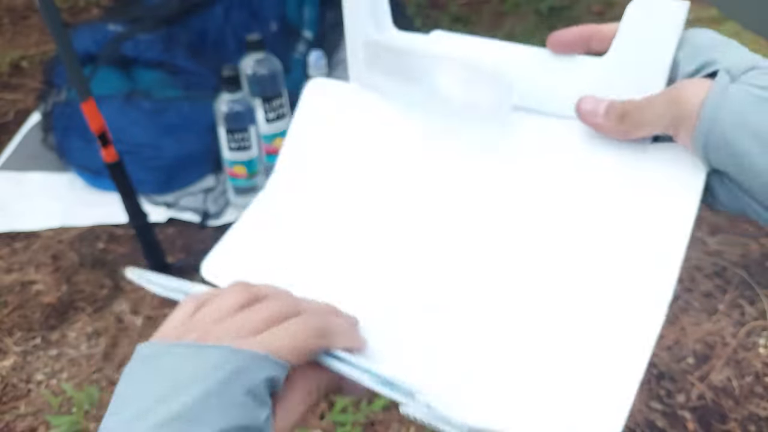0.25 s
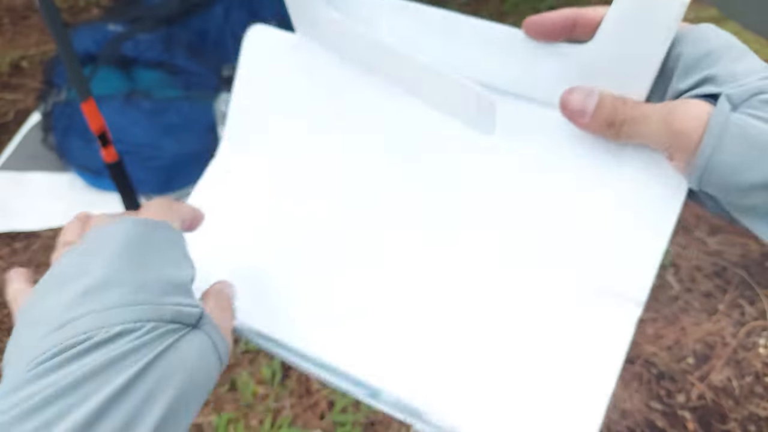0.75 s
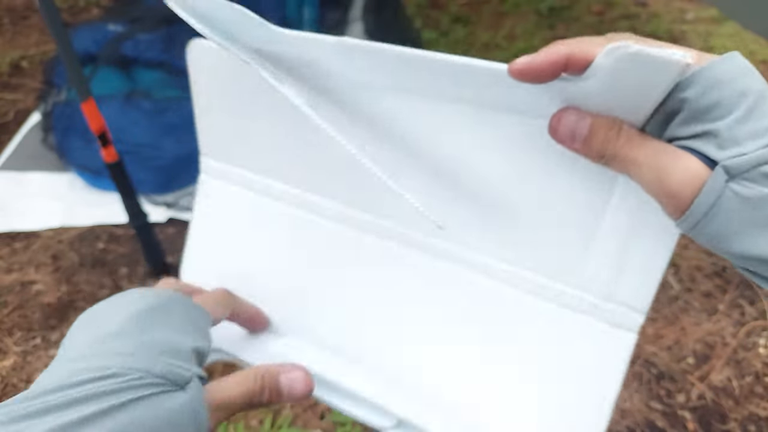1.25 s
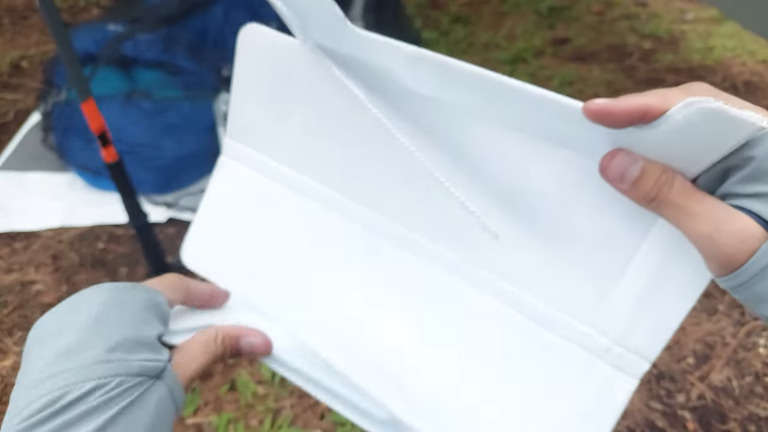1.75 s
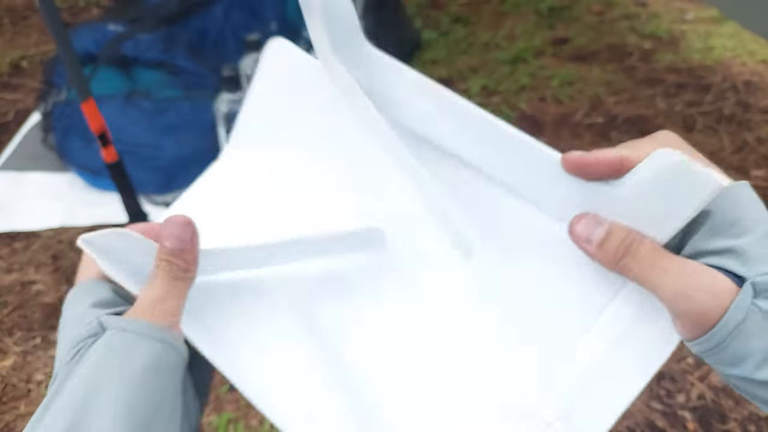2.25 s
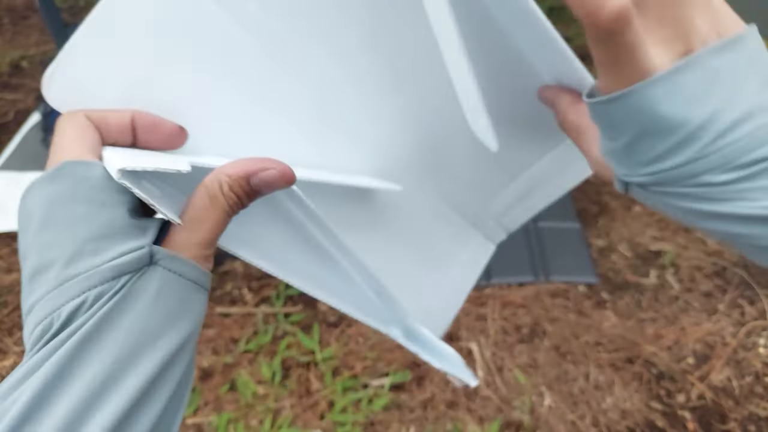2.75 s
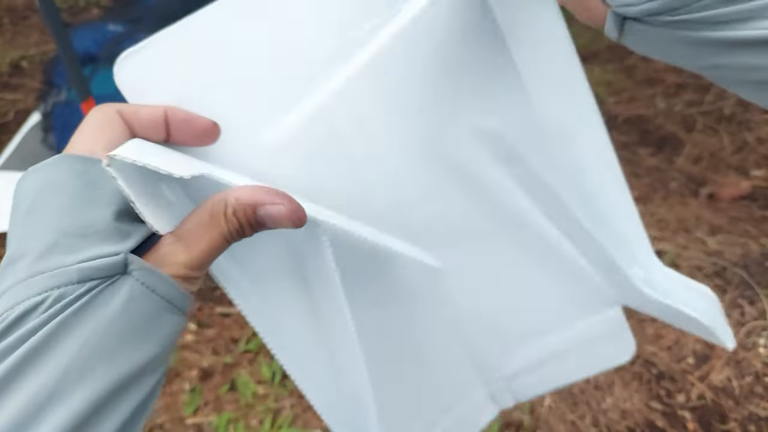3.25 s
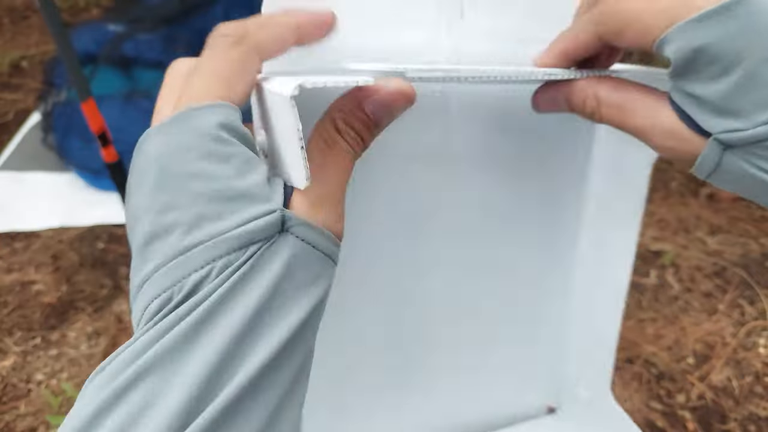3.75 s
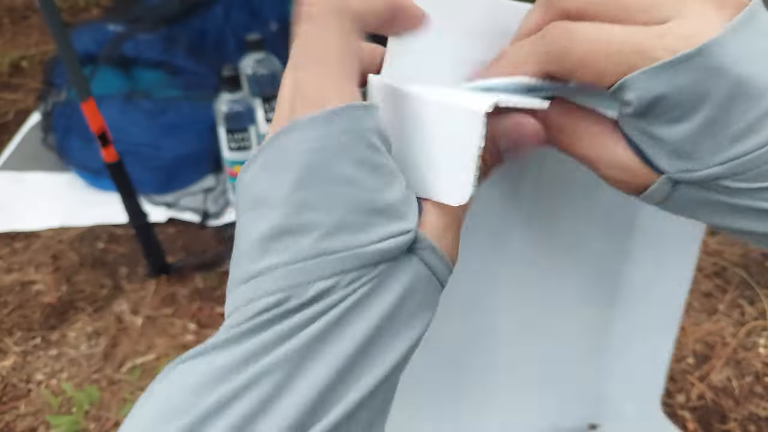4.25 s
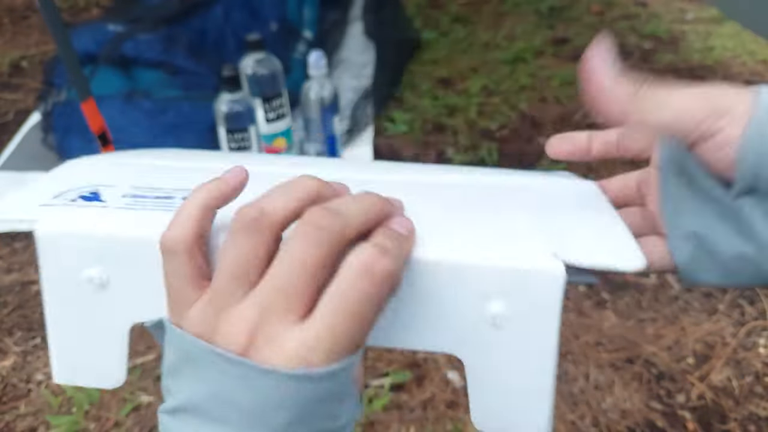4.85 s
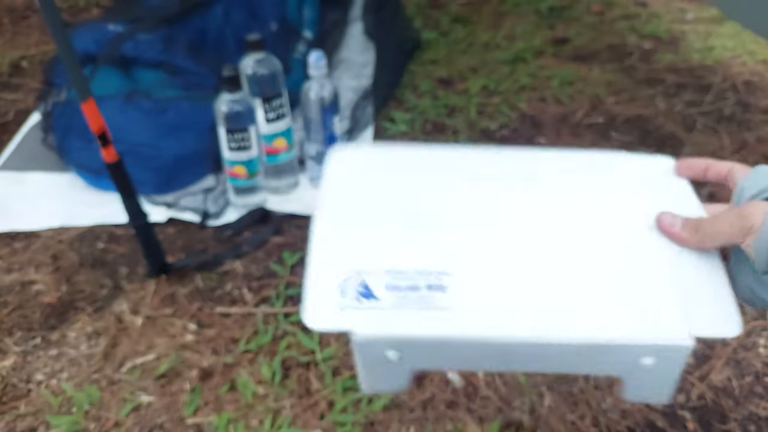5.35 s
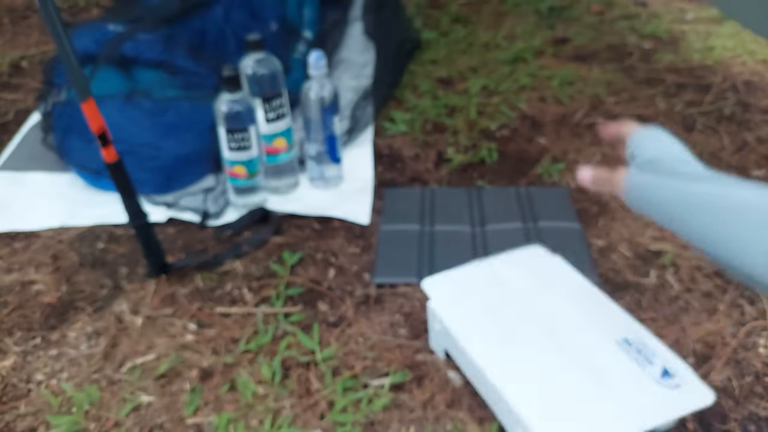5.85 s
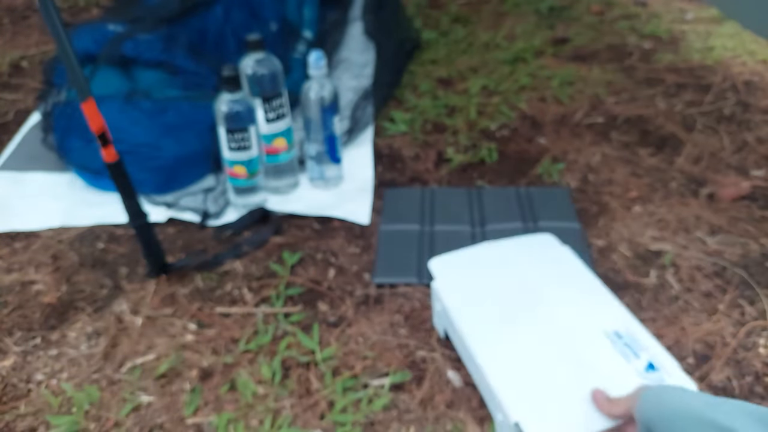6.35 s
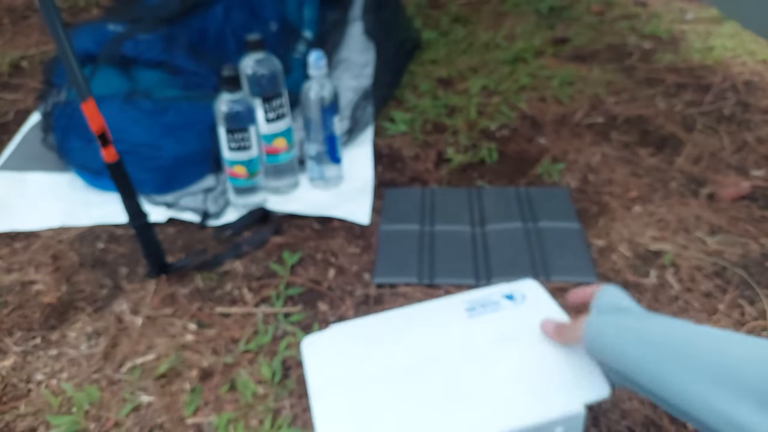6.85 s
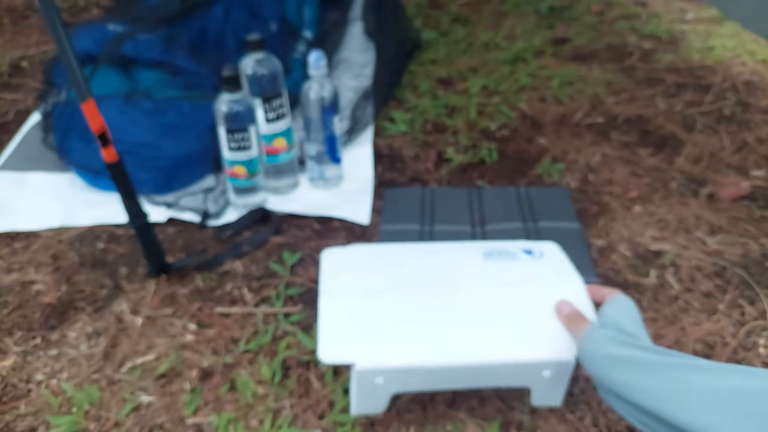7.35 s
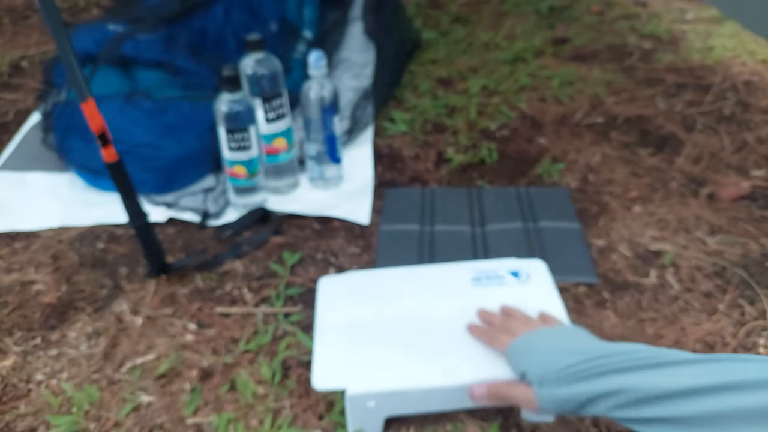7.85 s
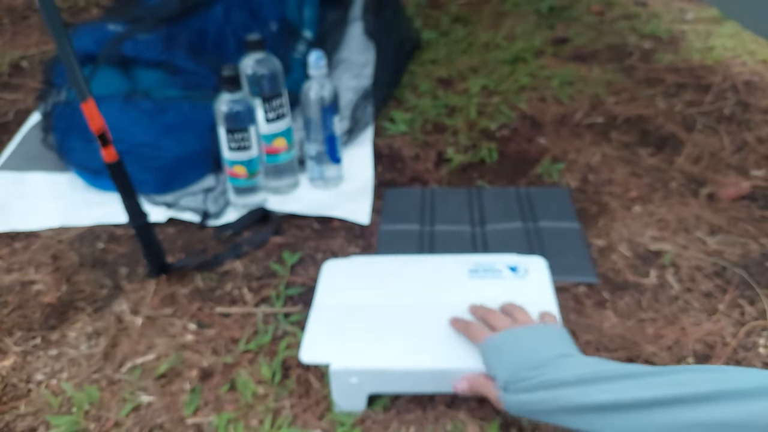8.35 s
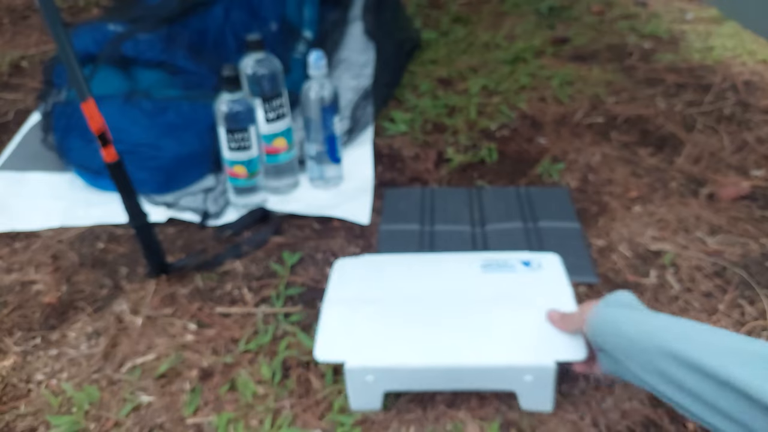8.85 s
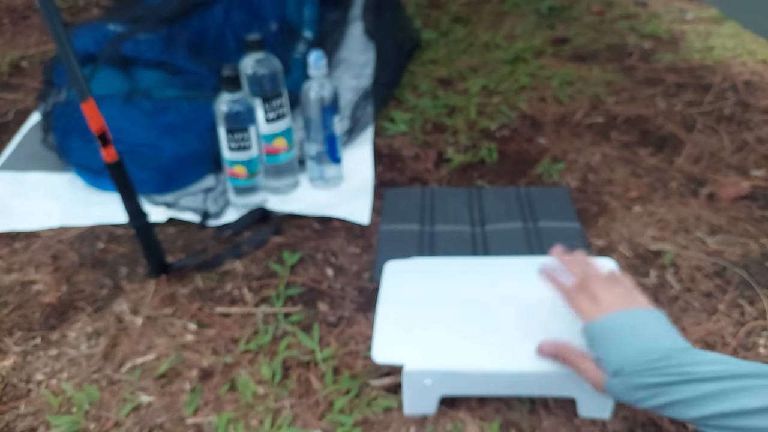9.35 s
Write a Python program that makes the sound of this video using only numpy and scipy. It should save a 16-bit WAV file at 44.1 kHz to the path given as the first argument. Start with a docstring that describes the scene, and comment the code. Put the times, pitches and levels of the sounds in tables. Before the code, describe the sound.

Dry, close outdoor sound on forest litter. From 0 to 1.9 s, hands handle a light fluted plastic sheet: faint ticks, small clicks around 1.1 s, skin rubs and sleeve swishes. At 1.95-2.4 s comes a lively cluster of hollow flap pops, loudest at 1.95 and 2.25, with a short crease creak and gritty scrapes. Sparse clicks and rustles follow; around 4.0-4.4 s low air puffs buffet the microphone among more clicks. A scrape at 5.15, then the legs land in a quick hollow knock at 6.0. A duller click at 7.0 and small shuffles precede two firm, boxy snaps at 8.0 and 9.5 s. Throughout, a high pulsing cicada buzz: one slows and ends near 3.5 s, another starts about 3.7, strongest mid-call, and fades by 9.7. Distant chorus hiss, soft rumble and a faint low hum, slightly stronger from 4.3 to 6.3, lie beneath.

```python
"""Forest litter: a small table of fluted plastic sheet is folded into shape by hand near the microphone and set down.
Clicks, knocks and creaks ring damped modes of flap, sheet, panel and top; the top snaps twice under a pressing palm.
Hands, sleeves and scrapes are coloured trains of tiny slips; gusts are low noise that buffets the microphone.
Two cicadas throb in turn as pulsed, pumped noise before a far chorus, over a low rumble and a faint hum."""
import sys
import numpy as np
from scipy import signal
from scipy.fft import rfft, irfft, next_fast_len
from scipy.io import wavfile
from scipy.ndimage import uniform_filter1d

SR = 44100
rng = np.random.default_rng(int(sys.argv[2]) if len(sys.argv) > 2 else 0)


def pcm_store(signal):
    """Save signal as 16-bit PCM."""
    levels = np.round(np.clip(np.atleast_2d(signal), -1, 1) * 32767)
    wavfile.write(sys.argv[1], SR, levels.astype(np.int16).T)


N = 423801

# Levels are set before the high-passes; gesture lengths run between half-gain points.
# flap and finger clicks: start_s, flap_peak_db, nominal_pitch_hz, sheet_re_flap_db, crack_re_flap_db
FLAP_CLICKS = [(0.068, -30.5, 400, 0, -5.5), (0.222, -38, 320, -3, 4.5), (0.716, -38.5, 357, 6, -2.5),
               (1.023, -39.5, 353, -3.5, -10), (1.053, -37.5, 397, -11, -5), (1.119, -34, 350, -9, 0.5),
               (1.136, -42, 350, -5, -8), (1.167, -32.5, 313, 10.5, -2), (1.43, -47, 250, 7.5, -13),
               (1.947, -20, 326, -9.5, -17.5), (1.982, -25, 262, -3.5, -13.5), (2.036, -30, 333, -22, -2.5),
               (2.073, -38.5, 202, -2, 3), (2.106, -29.5, 326, -9, -26), (2.176, -32.5, 215, -13, -10),
               (2.250, -16.5, 400, -11, -32), (2.299, -35, 350, -6, -24), (2.342, -34.5, 308, -9, -17),
               (2.370, -40, 336, -8, 3.5), (2.382, -38, 334, -3, -4), (2.415, -33.5, 343, -12, -13),
               (2.539, -32.5, 337, 2, -9), (2.682, -33, 224, 0, -14.5), (3.114, -37, 320, -8, -9.5),
               (3.783, -40, 205, -9, -1), (3.987, -26, 236, -7.5, -16), (4.144, -32.5, 290, -7.5, -20),
               (4.207, -38.5, 235, -6, -2), (4.325, -29.5, 221, -32, -10), (4.366, -40.5, 202, -25, 6.5),
               (4.413, -31.5, 577, 2, -11), (4.612, -38, 280, -1, -19), (4.656, -38, 237, -7, -9),
               (4.784, -34, 204, -14, -28), (5.911, -33.5, 364, -4, -5), (5.954, -35, 530, -10, -13.5),
               (6.111, -29.5, 308, -19, -31.5), (6.98, -23, 230, -14.5, -28), (7.155, -40, 554, -1.5, -12),
               (7.609, -31.5, 297, 0.5, -14), (8.343, -43, 356, -2.5, -18)]
# blows of landing and snap-through: start_s, body_peak_db, pitch_ratio, tilt_db_per_octave, sheet_peak_db, crack_peak_db
TABLE_BLOWS = [(5.979, -28, 1.67, -1, -23.5, -42), (5.986, -26, 1.1, 7, -37, -26.5),
               (5.989, -19, 1.08, -10, -29.5, -50), (7.979, -26.5, 0.97, -8, -38.5, -40),
               (7.9847, -19.5, 1.05, 20, -17, -22.5), (7.9924, -13.5, 1.02, 11, -18, -22.5),
               (7.998, -18, 1.01, 3, -40, -59), (9.5232, -21.5, 1.03, -7, -39, -29.5),
               (9.531, -12, 1.03, -1.5, -17.5, -23), (9.5369, -17, 1.13, 2, -17.5, -38),
               (9.566, -44, 1.2, 4, -46, -57)]
# bending modes of the standing table, before ratio and tilt: nominal_hz, level_db, t60_s
TABLE_MODES = [(198, -31, 0.048), (239.6, -3.5, 0.049), (343, 2.5, 0.044), (584, -6.5, 0.056),
               (664, 5, 0.022)]
# higher modes of the plastic sheet, before ratio: nominal_hz, level_db, t60_s
PLASTIC_MODES = [(967, -9, 0.017), (1104, 3.5, 0.0078), (1274, 6, 0.011), (1470, -1.5, 0.0097),
                 (1860, 3.5, 0.0097), (2040, -7.5, 0.009), (2150, -34.5, 0.044), (2586, -2.5, 0.013),
                 (3310, -6.5, 0.011), (3840, -9, 0.026)]
# modes of the creaking side panel: freq_hz, level_db, t60_s
PANEL_MODES = [(317, -9, 0.037), (368, -0.5, 0.074), (411, 3, 0.11)]
# spectrum of a cracking crease: freq_hz, level_db
CRACK_SPECTRUM = [(500, -3), (1500, -8.5), (4000, -1), (5300, -6), (7300, -3.5), (8800, -14.5),
                  (11500, -0.5), (15500, -4)]
# spectrum of skin on ribbed sheet: freq_hz, level_db
RUB_SPECTRUM = [(200, 20), (380, 18.5), (650, 14.5), (900, -2), (1500, 6), (2300, -16.5), (3500, 1.5),
                (7000, -28)]
# spectrum of a sleeve: freq_hz, level_db
SWISH_SPECTRUM = [(1000, 8.5), (2500, 3.5), (4500, 4.5), (6000, -4), (7400, 4), (8800, -9), (11000, 1),
                  (13000, 2.5), (15500, -3)]
# spectrum of air buffeting the microphone: freq_hz, level_db
GUST_SPECTRUM = [(25, -6), (50, -6), (85, -1), (150, -7.5), (260, -13.5), (380, -24.5), (480, -30),
                 (800, -47)]
# spectrum of the outdoor rumble: freq_hz, level_db
RUMBLE_SPECTRUM = [(15, -61), (25, -31), (70, 1), (162, -4), (247, -5), (283, -5.5), (406, -17.5),
                   (573, -24), (707, -25.5), (1330, -40.5), (1490, -34.5), (2400, -36), (3120, -64.5),
                   (5280, -120)]
# body resonances of the first near cicada: freq_hz, level_db
FIRST_BODY = [(2800, -43), (3400, -32), (3750, -3.5), (3970, 4.5), (4150, -3), (4450, -11.5), (6000, -40),
              (7300, -10.5), (8700, -59), (11200, -15), (12500, -39), (13800, -14), (14700, -1.5),
              (15700, -26.5)]
# body resonances of the second near cicada: freq_hz, level_db
SECOND_BODY = [(2800, -46), (3400, -33), (3800, -1), (4040, 1.5), (4200, -6.5), (4450, -18.5),
               (5800, -37.5), (7350, -14), (8600, -38.5), (10300, -18.5), (11300, -7.5), (12100, -31),
               (14600, -22.5), (15700, -24)]
# spectrum of the far cicadas: freq_hz, level_db
CHORUS_SPECTRUM = [(2400, -26), (3300, -6), (3850, -1), (4450, -15), (5900, -30.5), (7300, -12),
                   (8700, -33.5), (10200, -21), (11150, -10.5), (12100, -21.5), (14600, -21.5),
                   (15700, -29)]
# sheet, sleeves and ground scraping (window lasts 1.5 lengths): middle_s, nominal_length_s, level_db, centre_hz
SCRAPE_RUNS = [(0.194, 0.059, -59, 1460), (0.196, 0.067, -57, 13100), (0.681, 0.044, -54.5, 1840),
               (1.088, 0.11, -57.5, 1880), (1.488, .07, -58.5, 1560), (1.749, 0.041, -53.5, 1560),
               (1.895, 0.037, -54.5, 1460), (2.032, .04, -51.5, 1620), (2.173, 0.064, -54.5, 1710),
               (2.228, 0.031, -44.5, 1550), (2.382, 0.03, -47, 1530), (2.463, 0.08, -54.5, 13200),
               (2.683, 0.023, -48, 1450), (2.838, 0.063, -57, 550), (2.916, 0.033, -60, 1320),
               (3.3, .048, -56.5, 13600), (3.338, 0.043, -54, 1400), (3.34, 0.047, -58, 630),
               (3.721, 0.05, -51, 616), (3.725, 0.08, -57.5, 1550), (3.754, 0.069, -61.5, 13100),
               (4.308, 0.05, -53.5, 1190), (4.417, 0.013, -40.5, 2380), (4.453, 0.059, -57, 2180),
               (4.508, 0.041, -54.5, 1290), (4.944, 0.1, -60, 13900), (5.156, 0.058, -44, 1450),
               (5.57, 0.44, -68.5, 2470), (6.47, 0.06, -56.5, 564), (6.488, 0.12, -67, 1790),
               (7.011, 0.063, -49, 425), (7.015, 0.14, -75, 1620), (7.615, 0.067, -49.5, 527),
               (8.22, 0.29, -73, 2140), (9.13, 0.13, -63, 2300)]
# a hand slides to a new grip: start_s, length_s, level_db
HAND_RUBS = [(0.0, 0.098, -58.5), (1.02, 0.21, -58.5), (1.36, 0.24, -69.5), (1.95, 0.16, -59),
             (2.29, 0.4, -60), (2.82, .13, -55.5), (3.14, 0.32, -61.5), (4.42, 0.34, -58.5),
             (4.78, 0.35, -66), (5.45, 0.41, -72), (5.89, 0.19, -57), (7.03, 0.28, -62.5),
             (8.14, 0.17, -61), (8.9, 0.31, -60.5)]
# an arm moves its sleeve: start_s, length_s, level_db
SLEEVE_SWISHES = [(0.0, .26, -63.5), (.66, 0.053, -55), (1.03, 0.1, -59), (1.28, 0.17, -66.5),
                  (1.97, 0.32, -60), (2.45, 0.18, -62.5), (2.8, .16, -57), (3.0, 0.41, -66.5),
                  (4.29, 0.46, -60.5), (4.86, 0.16, -60), (5.35, .45, -64), (8.08, 0.24, -68.5),
                  (8.9, 0.33, -68.5)]
# the sheet fans the microphone: start_s, length_s, level_db
SHEET_GUSTS = [(0.05, 0.18, -50.5), (2.57, 0.39, -50.5), (4.0, .11, -37), (4.12, 0.2, -37.5),
               (4.33, 0.033, -35), (4.38, 0.084, -45.5), (4.52, 0.3, -55), (5.45, 0.22, -62),
               (7.32, 0.23, -52.5), (7.81, 0.27, -56.5)]
# the crease groans as the first side is bent up: start_s, length_s, level_db
CREASE_CREAKS = [(1.952, 0.033, -35.5), (2.0, .2, -52.5), (2.29, 0.066, -54)]
# first call, already under way: start_s, length_s, start_rate_hz, rate_loss_by_end_hz, power_of_fall
FIRST_CALL = (-2.608, 6.1, 16.24, 6.16, 5)
# second call: start_s, length_s, start_rate_hz, rate_loss_by_end_hz, power_of_fall
SECOND_CALL = (3.737, 6.0, 17.02, 3.7, 3.25)

# faint ticks of fingers on flaps
TICKS_FROM_S, TICKS_TO_S, TICK_COUNT = 0.8, 3.2, 6
TICK_PEAK_DB, TICK_NOMINAL_HZ = -45, 347
RUB_ATTACK_S, RUB_RELEASE_S = 0.018, 0.073
SWISH_ATTACK_S, SWISH_RELEASE_S = 0.086, 0.037
# skin and cloth never quite rest while the table is held
HELD_LENGTH_S, HELD_RUB_DB, HELD_SWISH_DB = 6.2, -73, -68.5
CREAK_ATTACK_S, CREAK_RELEASE_S = 0.015, 0.031
GUST_ATTACK_S, GUST_RELEASE_S = 0.015, 0.05
# air stirred while the table is moved about
DRAUGHT_DB, DRAUGHT_LENGTH_S = -60, 8.2
RUMBLE_DB = -57
# song levels at full effort, before throbbing
FIRST_DB, SECOND_DB = -59.5, -58
CALL_ATTACK_S, CALL_RELEASE_S = 0.11, 0.26
# effort peaks part-way; shares of call length
EFFORT_PEAK, EFFORT_WIDTH = 0.5, 0.2
# gain at no effort; about half the throb's swing at none and at full
SLACK_DB, SLACK_THROB_DB, FULL_THROB_DB = -4.5, 5.5, 12
# far cicadas: steady level, and the part that joins a near call, relative to it
CHORUS_DB, CHORUS_SWELL_RE_CALL_DB = -64.5, -5.5
# the raised sheet shades the microphone above a corner
SHADE_START_S, SHADE_LENGTH_S, SHADE_EDGE_S, SHADE_DB, SHADE_CORNER_HZ = 3.38, 0.45, 0.05, -9.5, 2480
# steady hum, and a swell added in power
HUM_DB = -61.5
HUM_SWELL_START_S, HUM_SWELL_LENGTH_S, HUM_SWELL_DB, HUM_EDGE_S = 4.26, 2.08, -55, 0.46


def flaps():
    """Each click thumps a held flap and chatters through the sheet, whose pitch varies with the grip."""
    out, t = np.zeros(N), np.arange(SR // 10) / SR
    tick_starts = rng.uniform(TICKS_FROM_S, TICKS_TO_S, TICK_COUNT)
    ticks = [(s, TICK_PEAK_DB, TICK_NOMINAL_HZ, -4, -3) for s in tick_starts]
    for start_s, db, hz, sheet_db, crack_db in FLAP_CLICKS + ticks:
        flap_modes = [(hz, 0, 0.038), (hz * 1.103, -8, 0.03), (hz * 0.605, -15, 0.04)]
        flap = ring(t, flap_modes, 0.99)
        grip_ratio = np.exp(0.031 * rng.standard_normal())
        sheet = chatter(t, grip_ratio, slip_db=-21.5, slip_t60=0.038)
        burst = crack(t, t60=0.027, tail_db=-2.5, tail_t60=0.088)
        click = flap + undb(sheet_db) * sheet + undb(crack_db) * burst
        add(out, start_s, undb(db) * click)
    # a small open sheet radiates little bass
    return lowcut(out, hz=245)


def tabletop():
    """Legs land and the top snaps through in quick groups of hollow modal blows, each with its own tilt."""
    out, t = np.zeros(N), np.arange(SR // 10) / SR
    for start_s, body_db, ratio, tilt_db, sheet_db, crack_db in TABLE_BLOWS:
        modes = [(hz, db + tilt_db * np.log2(hz), t60) for hz, db, t60 in TABLE_MODES]
        body = undb(body_db) * ring(t, modes, ratio)
        sheet = undb(sheet_db) * chatter(t, ratio, slip_db=-23.5, slip_t60=0.029)
        burst = undb(crack_db) * crack(t, t60=0.0049, tail_db=-12.0, tail_t60=0.068)
        add(out, start_s, body + sheet + burst)
    # further off on the litter: a little duller
    dull = signal.butter(1, 9000, fs=SR, output="sos")
    return signal.sosfilt(dull, lowcut(out, hz=176))


def chatter(t, ratio, slip_db, slip_t60):
    """Sheet modes struck once, then shaken by the decaying noise of a slipping edge; peak 1."""
    contact = undb(slip_db) * rng.standard_normal(len(t)) * fade(t, slip_t60)
    contact[0] = 1
    modes = ring(t, PLASTIC_MODES, ratio, scatter_db=2)
    return peak_one(signal.fftconvolve(contact, modes)[:len(t)])


def crack(t, t60, tail_db, tail_t60):
    """Bright noise burst with a longer scatter from the flutes; peak 1."""
    decay = fade(t, t60) + undb(tail_db) * fade(t, tail_t60)
    return peak_one(colour(rng.standard_normal(len(t)), CRACK_SPECTRUM) * decay)


def creak():
    """The crease gives way in small irregular jerks that drum on the side panel."""
    panel = ring(np.arange(SR // 10) / SR, PANEL_MODES, 1.0)
    jerks = grains(rate_hz=230, spread_db=1)
    groan = unit(lowcut(signal.fftconvolve(jerks, panel)[:N], hz=272))
    return groan * swells(CREASE_CREAKS, CREAK_ATTACK_S, CREAK_RELEASE_S)


def scrapes():
    """Runs of gritty stick and slip swell and stop; the sheet's modes colour them."""
    out = np.zeros(N)
    slips = grains(rate_hz=1200, spread_db=2)
    modes = ring(np.arange(SR // 10) / SR, PLASTIC_MODES, 0.925)
    sheet = unit(signal.fftconvolve(slips, modes)[:N])
    friction = slips + undb(-9) * sheet + undb(-6) * rng.standard_normal(N)
    for middle_s, length_s, db, centre_hz in SCRAPE_RUNS:
        start = int((middle_s - length_s * 0.75) * SR)
        count = int(length_s * 1.5 * SR)
        marks_hz = centre_hz * np.array([1 / 4, 0.55, 0.85, 1.15, 1.7, 7])
        spectrum = list(zip(marks_hz, [6.5, -17.0, 7.5, 4.0, -11.5, -19.0]))
        rasp = colour(friction[start:start + count], spectrum)
        add(out, start / SR, undb(db) * rasp * signal.windows.tukey(count, 0.8))
    return out


def hands():
    """Skin drags over the ribbed sheet in tiny slips while the sleeves swish."""
    rub_rows = HAND_RUBS + [(0.014, HELD_LENGTH_S, HELD_RUB_DB)]
    swish_rows = SLEEVE_SWISHES + [(0.083, HELD_LENGTH_S, HELD_SWISH_DB)]
    rub_gain = swells(rub_rows, RUB_ATTACK_S, RUB_RELEASE_S)
    swish_gain = swells(swish_rows, SWISH_ATTACK_S, SWISH_RELEASE_S)
    slips = grains(rate_hz=800, spread_db=2.5)
    threads = grains(rate_hz=5000, spread_db=2)
    rub_flicker_db, swish_flicker_db = 2 * walk(45), 2.5 * walk(35)
    rub = colour(slips, RUB_SPECTRUM) * rub_gain * undb(rub_flicker_db)
    swish = colour(threads, SWISH_SPECTRUM) * swish_gain * undb(swish_flicker_db)
    return rub + swish


def gusts():
    """Low noise: air buffets the microphone as the sheet swings past."""
    flutter_db = 3 * walk(40)
    rows = SHEET_GUSTS + [(0.047, DRAUGHT_LENGTH_S, DRAUGHT_DB)]
    flow = swells(rows, GUST_ATTACK_S, GUST_RELEASE_S)
    return colour(rng.standard_normal(N), GUST_SPECTRUM) * flow * undb(flutter_db)


def cicadas():
    """One insect winds down and another takes over; the far ones blur into a hiss that swells with them."""
    first, second = undb(FIRST_DB), undb(SECOND_DB)
    near = first * cicada(FIRST_BODY, FIRST_CALL) + second * cicada(SECOND_BODY, SECOND_CALL)
    calling = np.hypot(first * effort(FIRST_CALL)[-1], second * effort(SECOND_CALL)[-1])
    chorus_gain = np.hypot(undb(CHORUS_DB), undb(CHORUS_SWELL_RE_CALL_DB) * calling)
    return near + colour(rng.standard_normal(N), CHORUS_SPECTRUM) * chorus_gain


def cicada(body, call):
    """Tymbal clicks buzz in a hollow body; the pumping abdomen, slowing through the call, opens and shuts the song."""
    _, length_s, rate_hz, loss_hz, power = call
    age, work, gain = effort(call)
    throb_db = SLACK_THROB_DB + (FULL_THROB_DB - SLACK_THROB_DB) * work
    # integral of rate_hz - loss_hz * age ** power
    throbs = length_s * age * (rate_hz - loss_hz * age ** power / (power + 1))
    opening = np.tanh(2.5 * np.cos(2 * np.pi * throbs) + 0.38) - 0.73
    tymbal_hz = 277 * (1 + 0.01984 * walk(30))
    tymbal_phase = 2 * np.pi * np.cumsum(tymbal_hz) / SR
    pulses = rng.standard_normal(N) * undb(9 * np.cos(tymbal_phase))
    return gain * colour(pulses, body) * undb(throb_db * opening)


def effort(call):
    """Age in the call (0-1), how hard the insect works (0-1), and the gain that follows."""
    start_s, length_s, *_ = call
    age = np.clip((np.arange(N) / SR - start_s) / length_s, 0, 1)
    work = np.exp(-((age - EFFORT_PEAK) / EFFORT_WIDTH) ** 2)
    gate = swells([(start_s, length_s, 0)], CALL_ATTACK_S, CALL_RELEASE_S)
    return age, work, gate * undb(SLACK_DB * (1 - work))


def rumble():
    """Steady low outdoor noise with a slight drift in level."""
    drift_db = 1.5 * walk(8)
    return colour(rng.standard_normal(N), RUMBLE_SPECTRUM) * undb(RUMBLE_DB + drift_db)


def hum():
    """Narrow-band noise: a wavering low hum, louder for a while."""
    swell = swells([(HUM_SWELL_START_S, HUM_SWELL_LENGTH_S, HUM_SWELL_DB)], HUM_EDGE_S, HUM_EDGE_S)
    spectrum = [(100, -27), (122, -2.5), (131, 8), (140, -13.0), (170, -49)]
    return colour(rng.standard_normal(N), spectrum) * np.hypot(undb(HUM_DB), swell)


def shaded(x):
    """Bass bends round the raised sheet; treble is weakened."""
    raised = swells([(SHADE_START_S, SHADE_LENGTH_S, 0)], SHADE_EDGE_S, SHADE_EDGE_S)
    low = signal.sosfiltfilt(signal.butter(2, SHADE_CORNER_HZ, fs=SR, output="sos"), x)
    return low + undb(SHADE_DB * raised) * (x - low)


def undb(db):
    """Decibels to gain."""
    return 10 ** (np.asarray(db) / 20)


def unit(x):
    """Scale to rms 1."""
    return x / np.sqrt(np.mean(x ** 2))


def peak_one(x):
    """Scale to peak 1."""
    return x / np.abs(x).max()


def colour(x, points):
    """Filter by (freq_hz, level_db) points, falling 37 dB per octave beyond the ends; rms 1."""
    hz, db = np.transpose(points)
    size = next_fast_len(len(x))
    octave = np.log2(np.arange(size // 2 + 1) * SR / size + 1)
    marks = np.log2(hz)
    outside = np.abs(octave - np.clip(octave, marks[0], marks[-1]))
    gain = undb(np.interp(octave, marks, db) - 37 * outside)
    return unit(irfft(rfft(x, size) * gain, size)[:len(x)])


def walk(rate_hz):
    """Smooth random wandering with a spread near 1."""
    count = int(SR / rate_hz)
    steps = np.repeat(rng.standard_normal(N // count + 1), count)
    return uniform_filter1d(steps, count)[:N]


def grains(rate_hz, spread_db):
    """Tiny slips at random moments and of random size; rms 1."""
    moments = rng.random(N) < rate_hz / SR
    size = rng.standard_normal(N)
    size_db = spread_db * rng.standard_normal(N).clip(-2, 2)
    return unit(moments * size * undb(size_db))


def fade(t, t60):
    """Exponential decay by 60 dB in t60 seconds."""
    return np.exp(-np.log(1000) * t / t60)


def ring(t, modes, ratio, scatter_db=None):
    """Damped sine modes, reweighted at random per blow if a scatter is given; peak 1."""
    hz, db, t60 = np.transpose(modes)[:, :, None]
    if scatter_db is not None:
        db = db + scatter_db * rng.standard_normal(db.shape)
    partials = undb(db) * np.sin(2 * np.pi * hz * ratio * t) * fade(t, t60)
    return peak_one(np.sum(partials, axis=0))


def swells(rows, attack_s, release_s):
    """Gain of gestures that each rise, hold and fall; overlapping ones add in power."""
    t, power = np.arange(N) / SR, np.zeros(N)
    for start_s, length_s, db in rows:
        rise, fall = (t - start_s) / attack_s, (start_s + length_s - t) / release_s
        gate = np.clip(np.minimum(rise, fall) + 0.5, 0, 1)
        power += (undb(db) * gate) ** 2
    return np.sqrt(power)


def lowcut(x, hz):
    """Second-order high-pass."""
    return signal.sosfilt(signal.butter(2, hz, "high", fs=SR, output="sos"), x)


def add(out, start_s, sound):
    """Mix a sound in at a time."""
    start = int(start_s * SR)
    out[start:start + len(sound)] += sound[:N - start]


def scene():
    """Table, hands and forest at one microphone."""
    table = flaps() + tabletop() + creak() + scrapes()
    return (table + shaded(hands() + cicadas()) + gusts() + rumble() + hum())[None]


def record(dry):
    """The recorder cuts the deepest bass steeply, and the top."""
    top_cut = signal.ellip(10, 0.2, 80, 15850, fs=SR, output="sos")
    return signal.sosfilt(top_cut, lowcut(lowcut(dry, hz=34), hz=31))


dry = scene()
out = record(dry)
pcm_store(out)
```